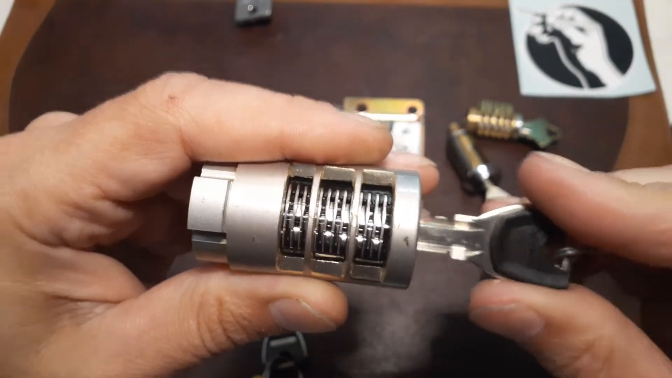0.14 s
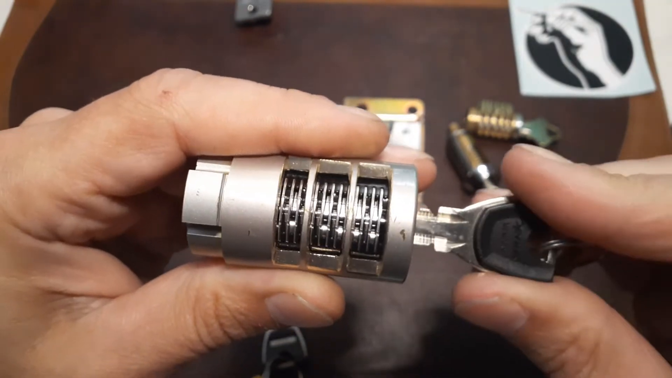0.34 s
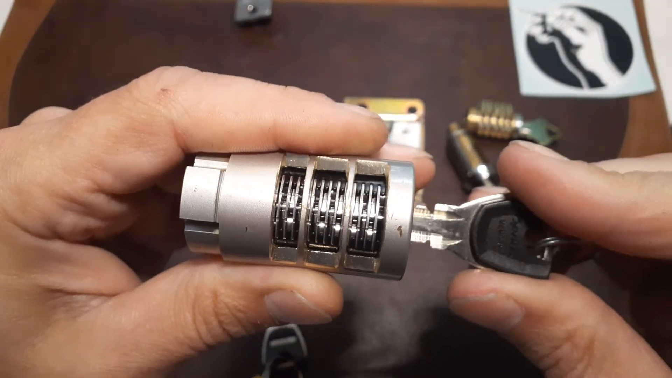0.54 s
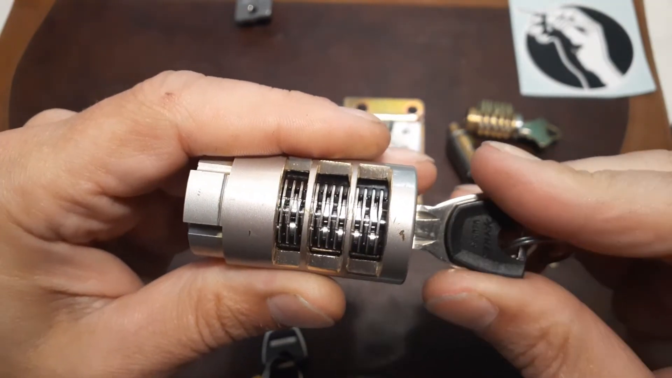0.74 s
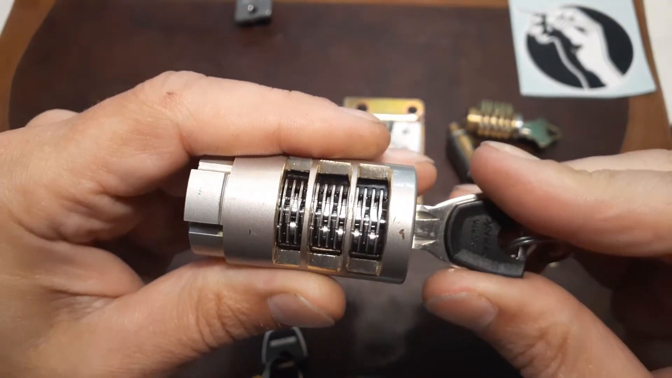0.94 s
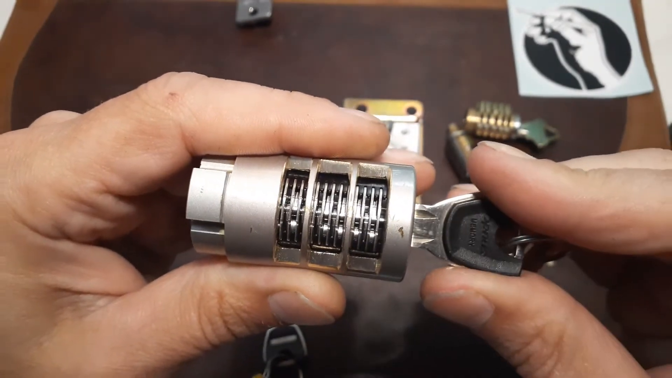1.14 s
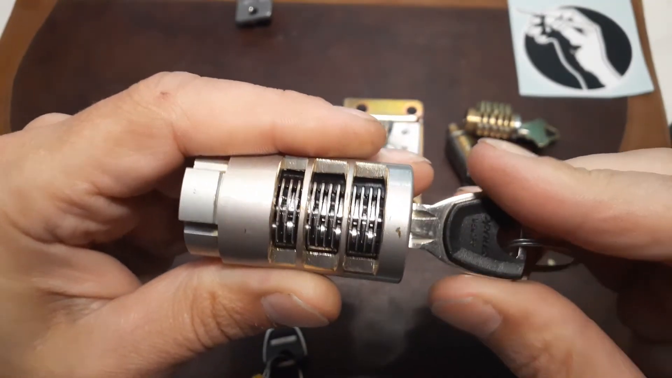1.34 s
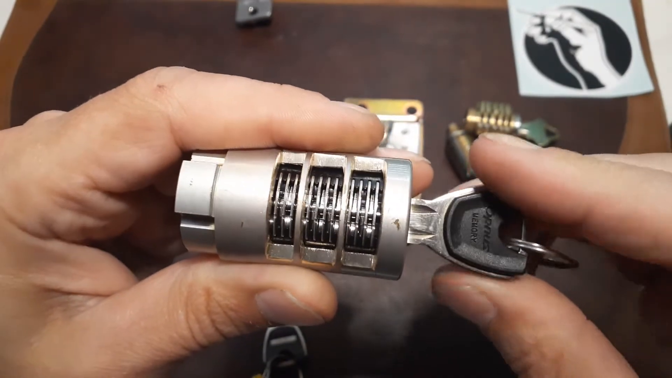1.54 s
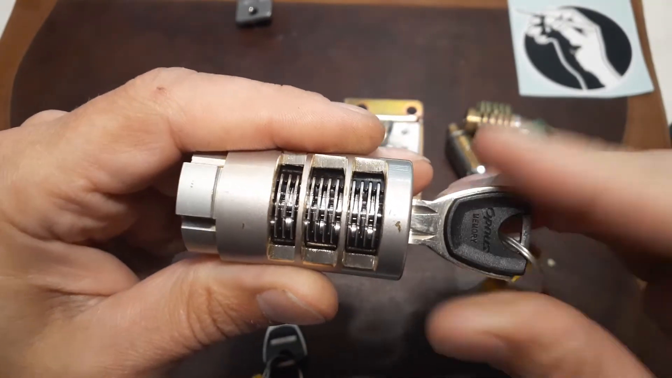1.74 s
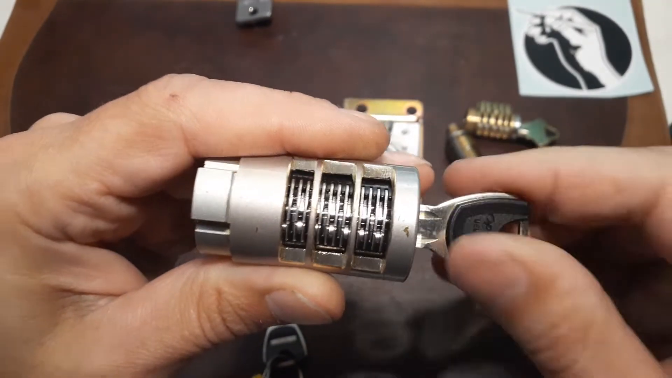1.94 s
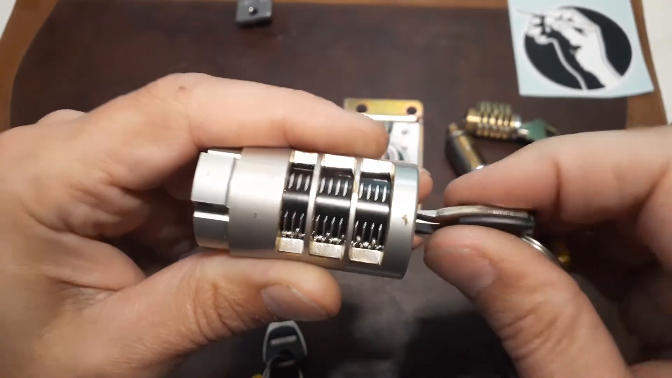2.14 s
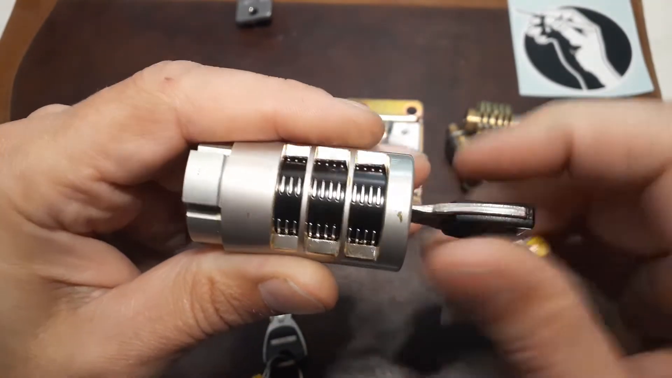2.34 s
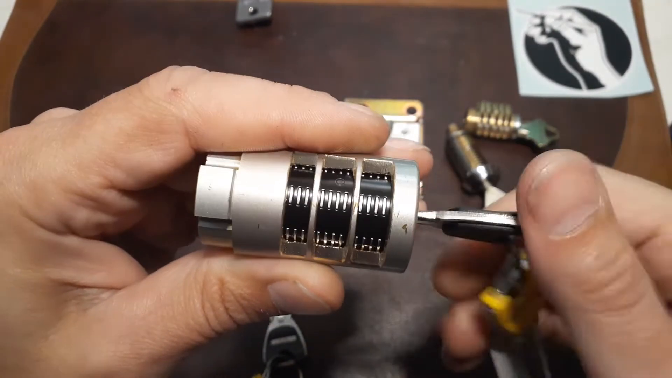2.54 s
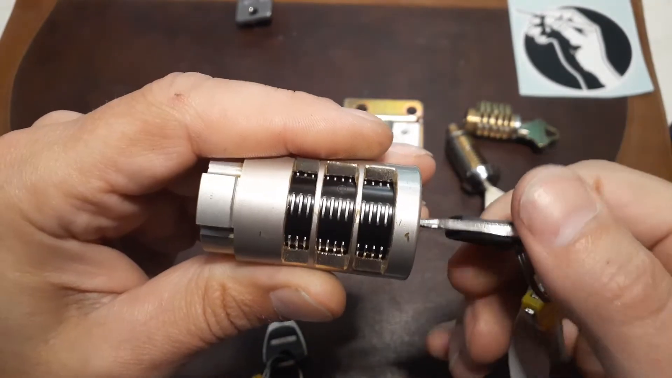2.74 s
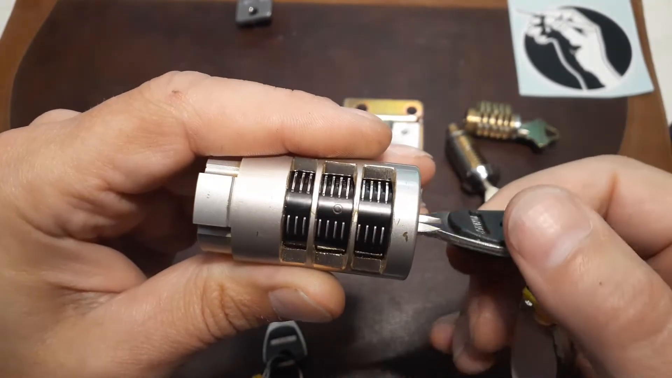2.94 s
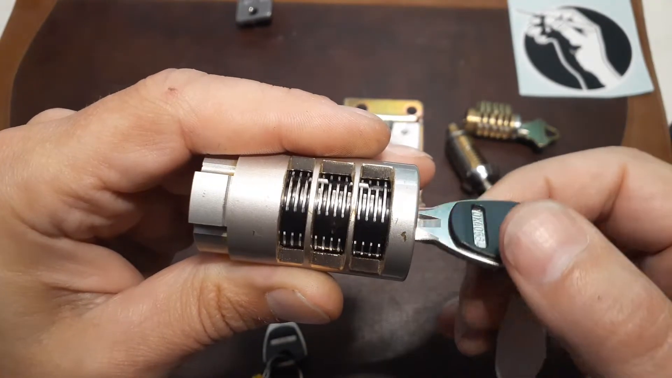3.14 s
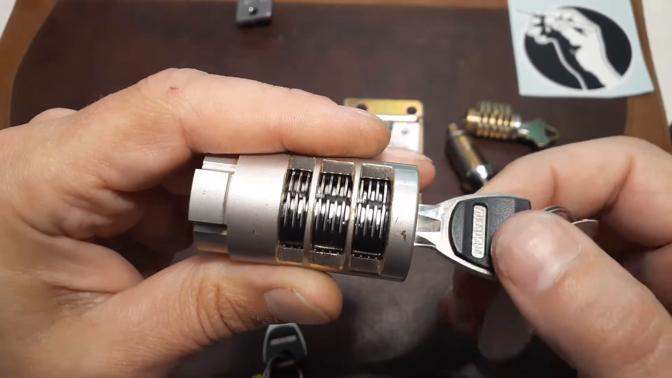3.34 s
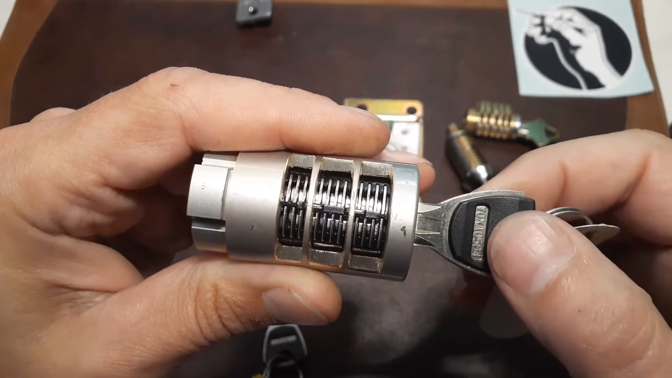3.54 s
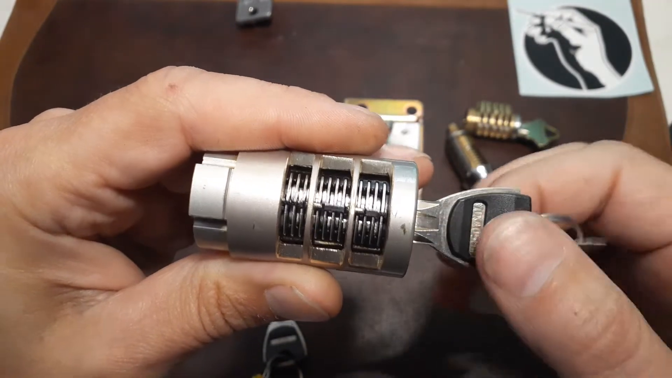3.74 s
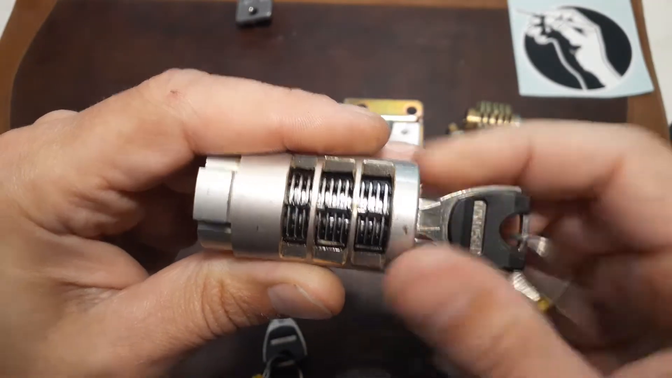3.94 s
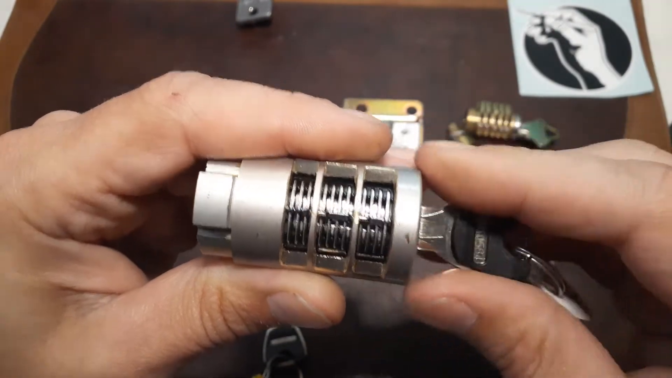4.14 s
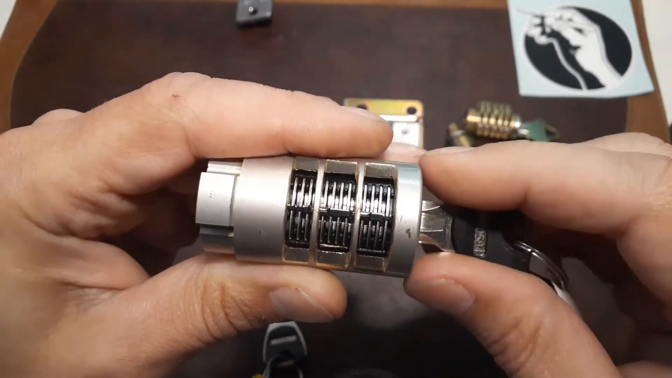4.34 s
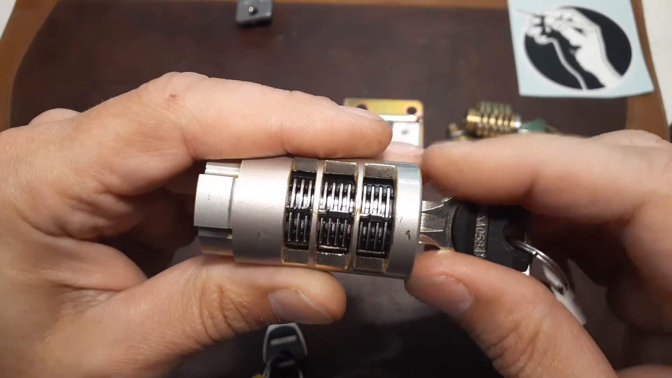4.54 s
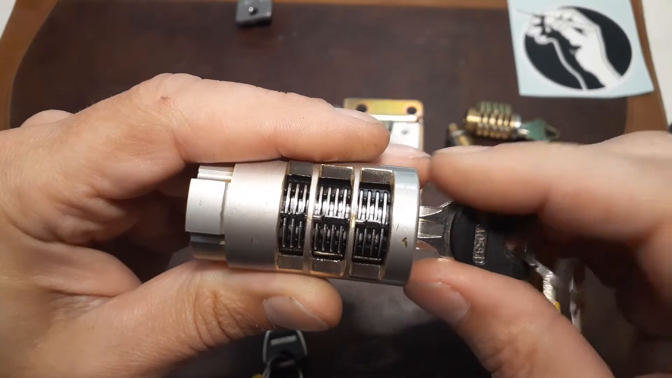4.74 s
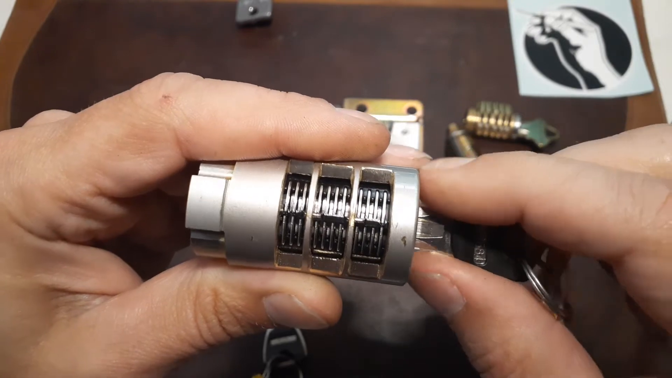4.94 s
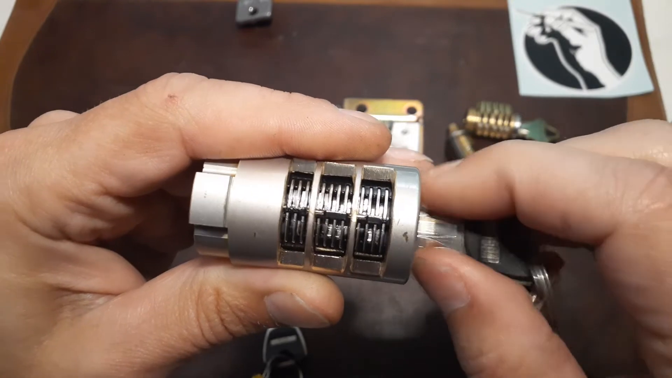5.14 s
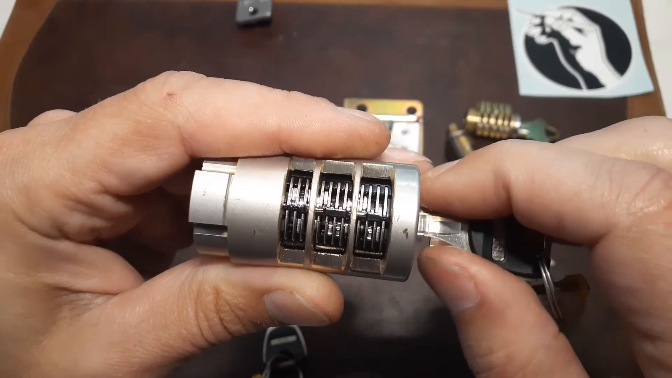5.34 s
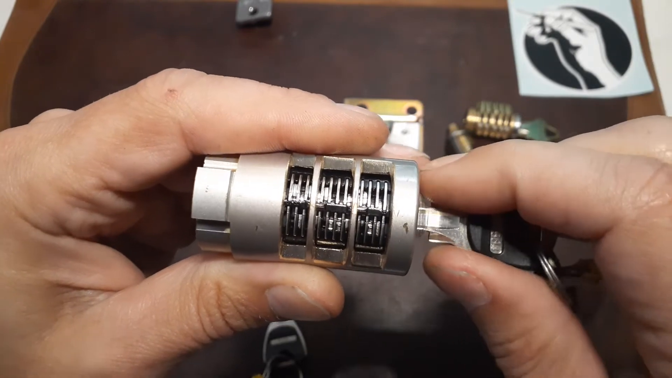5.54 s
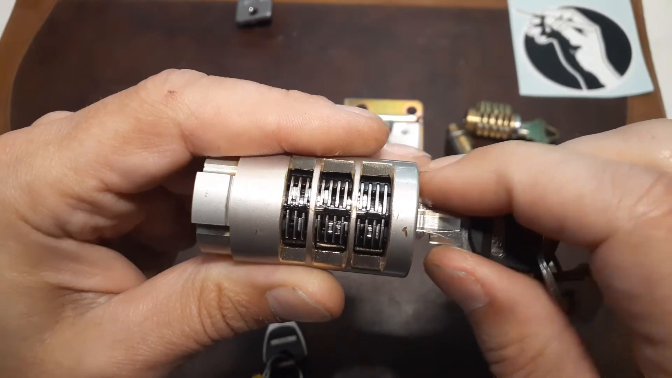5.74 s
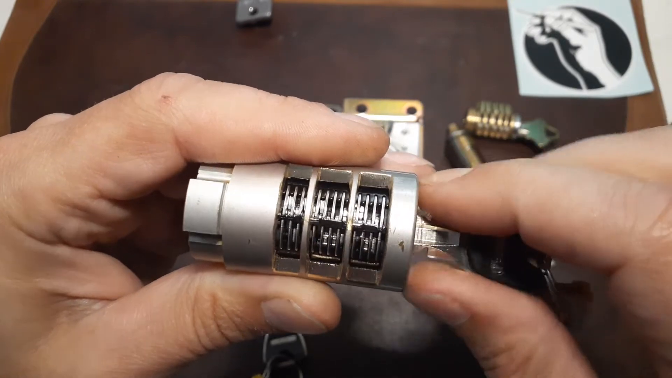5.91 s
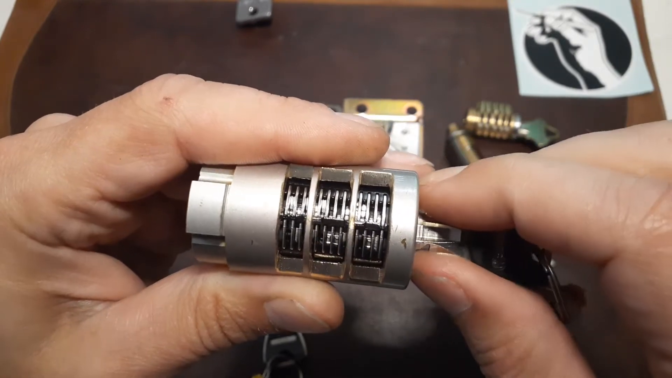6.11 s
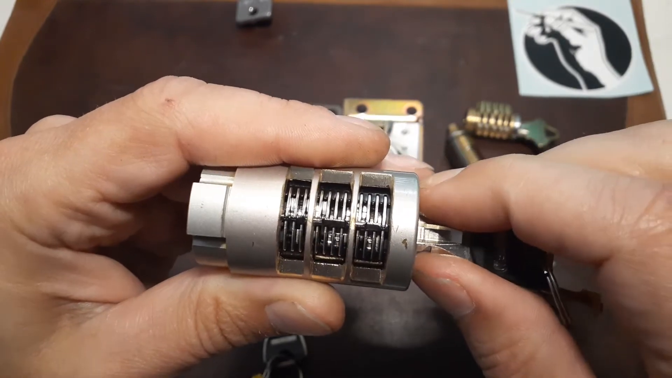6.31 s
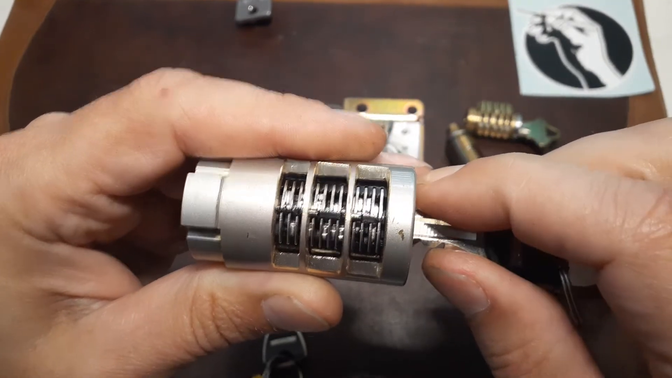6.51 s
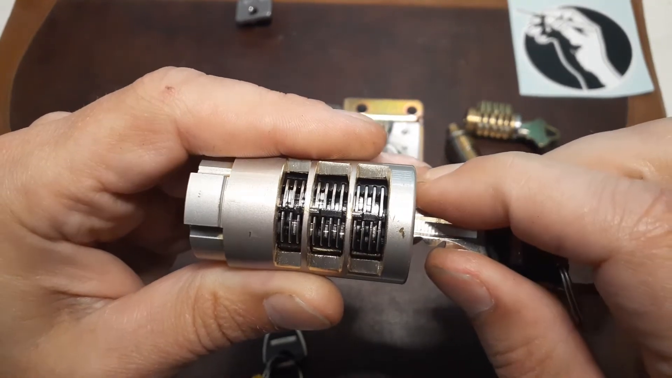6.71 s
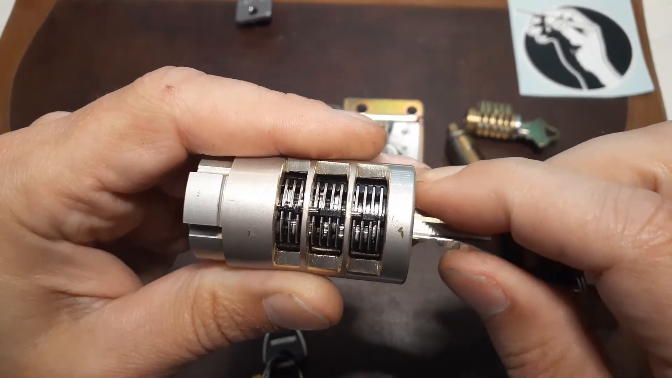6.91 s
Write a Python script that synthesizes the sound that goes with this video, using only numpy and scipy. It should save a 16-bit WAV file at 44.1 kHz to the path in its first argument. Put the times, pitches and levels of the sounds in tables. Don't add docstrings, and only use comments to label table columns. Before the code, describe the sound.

Close, sharp metallic clicks of a key worked in a disc lock, with light finger rubbing, soft air thumps and quiet room hum.

```python
import sys
import numpy as np
from scipy import signal
from scipy.fft import rfft, irfft, next_fast_len
from scipy.io import wavfile
from scipy.ndimage import uniform_filter1d

SR = 44100
rng = np.random.default_rng(int(sys.argv[2]) if len(sys.argv) > 2 else 0)


def natural_amplitude(level_db):
    exponent = np.asarray(level_db, float) / 20
    return 10 ** exponent


def store_pcm(level_fs):
    pcm = np.round(np.clip(level_fs, -1, 1) * 32767).astype(np.int16)
    wavfile.write(sys.argv[1], SR, np.atleast_2d(pcm).T)


N = 307377


def rms_one(x):
    return x / np.sqrt(np.mean(x ** 2) + 1e-20)


def at_hz(points, hz, col=1):
    points = np.array(points, float)
    return np.interp(np.log(hz), np.log(points[:, 0]), points[:, col])


def band(x, low_hz, high_hz):
    return signal.sosfilt(signal.butter(2, [low_hz, high_hz], "band", fs=SR, output="sos"), x)


def left_right(difference_db):
    return natural_amplitude(np.array([[0.5], [-0.5]]) * difference_db)


def drift(rate):
    step, settle = 40, 2000
    r = np.exp(-2 * np.pi * rate * step / SR)
    chance = rng.standard_normal(N // step + settle + 2)
    slow = signal.lfilter([1], [1, -2 * r, r * r], chance)[settle:]
    return np.interp(np.arange(N) / step, np.arange(len(slow)), rms_one(slow))


def swells(rows, rise, edge_db, power):
    gain, t = np.zeros(N), np.arange(N) / SR
    rise = np.clip(rise, 0.05, 0.95)
    for top_s, length, level_db in rows:
        first = max(round((top_s - 2 * length) * SR), 0)
        at = slice(first, round((top_s + 2 * length) * SR))
        before = (top_s - t[at]) / rise
        after = (t[at] - top_s) / (1 - rise)
        away = np.maximum(before, after) / length
        gain[at] += natural_amplitude(level_db - edge_db * away ** power)
    return gain


def contacts_of_key():
    # (time [s], peak [dB], barrel knock re snap [dB], chatter [ms])
    push_in = [(0.111, -32.5, -12, 2.5), (0.1144, -25, -8, 8.9), (0.1186, -30.5, -15.5, 3.7),
               (0.1332, -24.5, -7, 1.8), (0.1436, -30.5, -26.5, 7.2), (0.1525, -17, -10.5, 3.9),
               (0.1605, -26, -2.5, 2.3), (0.168, -20, -6.5, 1.8), (0.1873, -33, -5.5, 1.2),
               (0.2088, -32.5, -10.5, 2.0), (0.212, -21, -7.5, 1.2), (0.2169, -27, -6.5, 6),
               (0.2227, -32.5, -8.5, 2.5), (0.2319, -36, 0, 0.83), (0.6108, -39.5, -13, 2),
               (0.62, -28.5, -9, 2.0), (0.622, -24, -11, 5.7), (0.6261, -27, -9.5, 3.3),
               (0.6329, -22.5, -4.5, 1.7), (0.6481, -35.5, 0, 3.5), (0.656, -25.5, -9, 1.4),
               (0.6598, -16, -13.5, 3.6), (0.6659, -19.5, -3.5, 0.65), (0.672, -33, -21.5, 2.2)]
    # (time [s], peak [dB], barrel knock re snap [dB], chatter [ms])
    turning = [
        (2.024, -46, -12, 3.0),
        (2.0272, -30, -11.5, 8.6),
        (2.0346, -36.5, -7, 5.4),
        (2.0882, -35.5, -31, 2.7),
        (2.0935, -35, -10, 1.4),
        (2.0967, -37.5, -6.5, 3.7),
        (2.104, -46, 5.5, 4.0),
    ]
    # (time [s], peak [dB], barrel knock re snap [dB], chatter [ms])
    stopping = [
        (3.4345, -26.5, -11.5, 1.5),
        (3.436, -17, -14, 0.97),
        (3.439, -26.5, -7.5, 1.1),
        (3.442, -27, -8.5, 3.0),
        (3.451, -34, -17, 4.1),
        (4.0903, -40, -7.5, 1.56),
        (4.986, -45, -12, 1.1),
    ]
    # (time [s], peak [dB], barrel knock re snap [dB], chatter [ms])
    pull_out = [(5.1486, -39.5, -8, 1.25), (5.169, -25.5, -13.5, 2.1), (5.173, -22.5, -12.5, 5.3),
                (5.1771, -22, -24, 1.6), (6.4992, -34, -19.5, 1.6), (6.5105, -32, -20, 2.5),
                (6.5139, -21.5, -15, 2.9), (6.5193, -23, -17.5, 2.26), (6.809, -39.5, -23, 2.6),
                (6.8176, -25, -12.5, 3.9), (6.823, -18, -17.5, 0.93), (6.835, -45.5, 1, 2.2)]
    # (time [s], peak [dB], barrel knock re snap [dB], thinness [dB])
    touches = [(1.3226, -53, -7, 4.5), (1.6517, -58, -26.5, 4), (1.8197, -52, -13, -2),
               (1.9156, -64, 3.5, 7), (1.9298, -57.5, -1, -2), (1.977, -50.5, -16, -2),
               (2.0037, -57.5, 0, -1), (2.397, -56, -10, 5), (2.6404, -63, -15, 6), (2.7156, -65, -12, -28),
               (2.771, -55, 9, -19), (2.7823, -42.5, 3.5, -23.5), (2.8964, -68, 9, -6), (2.912, -72, 1, 10),
               (3.4115, -63, -8, 13.5), (3.4218, -54.5, -11, 7.5), (3.6647, -62.5, 9, -2),
               (3.9889, -55, 7.5, -12), (4.046, -57, -15, 1.5), (4.0807, -61.5, 13, 9),
               (4.1466, -55, -9, 3), (4.822, -60, 2.5, 0.5), (4.985, -49.5, -4.5, -12.5),
               (5.114, -54, -7.5, -12), (5.3376, -57, -9.5, -3)]
    depth_per_knock, thin_per_knock = 0.55, -0.2
    contacts = []
    for rows, deep_db, thin_db in ((push_in, -10, 6.5), (turning, -2.5, 4),
                                   (stopping, -2.5, 3.76), (pull_out, -6.5, 6)):
        for s, peak_db, knock_db, chatter_ms in rows:
            excess_db = knock_db + 10
            depth_db = deep_db + depth_per_knock * excess_db
            contacts.append((s, peak_db, knock_db, chatter_ms, depth_db, thin_db + thin_per_knock * excess_db))
    for s, peak_db, knock_db, thin_db in touches:
        contacts.append((s, peak_db, knock_db, 1.7, -3.0 + depth_per_knock * knock_db, thin_db))
    return contacts


def struck(spectrum, tilt_db, pivot_hz, t60, lag_s, spread_db, scatter=1.1, count=64):
    t = np.arange(SR // 90) / SR
    hz = np.linspace(spectrum[0][0], spectrum[-1][0], count)[:, None] * rng.uniform(0.97, 1.03, (count, 1))
    colour_db = at_hz(spectrum, hz) + 0.7 * tilt_db * np.tanh(np.log2(hz / pivot_hz) / 0.12)
    decay = natural_amplitude(colour_db - 60 * t / (t60 * rng.uniform(0.29, 2.7, hz.shape)))
    own_db = spread_db * rng.standard_normal((2, count, 1))
    common_db = spread_db * rng.standard_normal((count, 1))
    phase = scatter * rng.standard_normal((2, count, 1)) + 2 * np.pi * rng.random((count, 1))
    phase[0] -= 2 * np.pi * hz * lag_s
    return (natural_amplitude(own_db + common_db) * decay * np.sin(2 * np.pi * hz * t + phase)).sum(axis=1)


def snaps():
    # (frequency [Hz], level [dB per Hz])
    disc_colour = [(3410, -45), (5800, -23), (6460, -11.5), (7480, -13), (8650, 1), (10600, -2.5),
                   (14300, 1.5), (15700, -1)]
    # (frequency [Hz], level [dB per Hz])
    barrel_colour = [(1150, -32.5), (1600, -14), (2200, 1.5), (2800, -2), (3500, 1.5), (4200, -0.5),
                     (5300, -11), (6500, -12.5)]
    out, push = np.zeros((2, N + SR)), np.zeros(N + SR)
    t = np.arange(SR // 30) / SR
    for s, peak_db, knock_db, chatter_ms, deep_db, thin_db in contacts_of_key():
        start = round(s * SR)
        onset = 1 - np.exp(-t / (0.000056 * chatter_ms))
        fade = onset * np.exp(-t / (0.001 * chatter_ms))
        contacts = fade * rng.standard_normal(len(t)) * natural_amplitude(4.8 * rng.exponential(1, len(t)))
        push[start:start + len(t)] += natural_amplitude(peak_db + knock_db - 10.5) * fade * np.sign(contacts[1])

        blunt = np.clip((-12 - thin_db) / 13.5, 0, 1)
        light = np.clip((-44.5 - peak_db) / 12, 0, 1)
        disc = struck([(hz, db * (1 - blunt)) for hz, db in disc_colour], thin_db - 4.0, pivot_hz=10800,
                      t60=0.0075 + 0.004 * light, lag_s=0.0001, spread_db=2.5 + 2.9 * light)
        barrel = struck([(hz, db * (1 - blunt)) for hz, db in barrel_colour], -deep_db - 5.0, pivot_hz=2340,
                        t60=0.0098, lag_s=0.00017, spread_db=-0.5 + 0.84 * light, scatter=0.76, count=40)
        for modes, level_db, pan_db in ((disc, -2.1, 6.5), (barrel, knock_db - 3.5, 3.5)):
            hit = signal.fftconvolve(modes, contacts[None], axes=1)
            power = uniform_filter1d(hit ** 2, size=50)
            top = np.sqrt(power.max(axis=1, keepdims=True))
            out[:, start:start + hit.shape[1]] += natural_amplitude(peak_db + level_db) * left_right(pan_db) * hit / top
    small = signal.sosfilt(signal.butter(4, 1200, "high", fs=SR, output="sos"), out[:, :N])
    return small + band(push[:N], 250, 1500) * left_right(3.0)


def rubbing():
    # (top [s], length [s], level [dB])
    grip = [
        (2.0, 0.95, -83.5),
        (2.8, 1.53, -88),
        (3.8, 1.0, -82.5),
        (5.1, .8, -81),
    ]
    # (most pressure [s], length [s], key ring [dB], skin re ring [dB], barrel re ring [dB])
    strokes = [(1.341, 0.055, -83, 10, -4), (1.84, 0.047, -71.5, 2, -5), (1.979, 0.082, -61, 0, -4),
               (2.036, 0.044, -63, -1, -4), (2.068, 0.027, -65, 8, -11), (2.164, 0.069, -67.5, 4.5, -4.5),
               (2.384, 0.045, -71.5, 0, -8), (2.441, 0.057, -70, 3.5, -4), (2.635, 0.12, -77, 0, -12),
               (2.713, 0.043, -61.5, -9, -9.5), (2.762, 0.06, -67, -14, -3), (2.797, 0.095, -83, 10, 3),
               (2.915, 0.026, -71, -4, 1.5), (3.64, .04, -85, 9, 14), (3.675, 0.064, -67, -4, 0.2),
               (3.907, .13, -71, -5, -12), (3.99, 0.078, -74, -10, -3), (4.037, 0.064, -75.5, 1, 2),
               (4.094, 0.059, -77.5, 4, 9.5), (4.15, .06, -76, 4.5, -2.5), (4.835, 0.056, -77.5, -7, 0),
               (4.982, 0.047, -76.5, -10, -1.5), (5.353, 0.076, -78, 4.5, 3), (5.89, 0.19, -80.5, 1, -5)]
    bursts_db = 2.6 * np.minimum(rng.exponential(1, N), 5) + 2.2 * drift(150)
    slips = rng.standard_normal((2, N)) * natural_amplitude(bursts_db)
    key = band(slips, 8450, 9500)
    key += natural_amplitude(-6.0) * band(slips, 7140, 7700) + natural_amplitude(-10.0) * band(slips, 7500, 11500)
    skin = band(slips, 11100, 15700)
    skin += natural_amplitude(-2.5) * band(slips, 10200, 13000) + natural_amplitude(-18.0) * band(slips, 5100, 7300)
    barrel = band(slips, 1700, 2150) + natural_amplitude(4.5) * band(slips, 2220, 2380)
    barrel += natural_amplitude(-1.5) * band(slips, 3780, 4460) + natural_amplitude(-4.0) * band(slips, 2900, 3400)

    s, length, key_db, skin_db, barrel_db = np.transpose(strokes)
    out = swells(grip, rise=0.45, edge_db=9.5, power=2) * rms_one(band(slips[::-1], 5000, 21000))
    for x, level_db in ((key, key_db), (skin, key_db + skin_db), (barrel, key_db + barrel_db)):
        pressure = swells(zip(s, length, level_db), rise=0.39, edge_db=11.5, power=1.3)
        out = out + pressure * natural_amplitude(2.0 * drift(23)) * rms_one(x)
    return out * natural_amplitude([[1.5], [-3.5]])


def rings():
    # (struck [s], frequency [Hz], level [dB], t60 [s], left-right difference [dB])
    ring_tones = [
        (0.156, 7150, -61.5, 0.4, -3.5),
        (.212, 7120, -53.5, 0.45, 4),
        (.212, 7300, -67, 0.19, 0),
        (.661, 7130, -52.5, 0.52, 3.5),
        (.661, 7390, -56.5, 0.3, 0.5),
        (.661, 7930, -77, .6, -2.5),
        (3.436, 4393, -42.5, 0.36, 13.5),
        (3.437, 8575, -35, .05, 7.5),
    ]
    out = np.zeros((2, N))
    t = np.arange(SR) / SR
    for s, hz, level_db, t60, pan_db in ring_tones:
        stilled_db = -20 * np.maximum(t - 0.27, 0) / 0.05
        phase = 2 * np.pi * hz * t + np.array([[0], [1.2]])
        tone = natural_amplitude(level_db - 60 * t / t60 + stilled_db) * np.sin(phase)
        start = round(s * SR)
        out[:, start:start + SR] += tone * left_right(pan_db)
    return out


def draught():
    # (top [s], length [s], level [dB])
    gusts = [
        (.19, 0.24, -64),
        (.65, 0.23, -67.5),
        (1.545, 0.14, -42.5),
        (1.656, .08, -59),
        (4.01, .14, -45),
        (4.096, 0.051, -63.5),
        (4.168, 0.12, -41),
        (6.525, 0.15, -66.5),
        (6.89, .3, -71),
    ]
    lumps = band(rng.standard_normal((2, N)), 66, 140) * natural_amplitude(2.0 * drift(27))
    pressure = swells(gusts, rise=0.35, edge_db=24, power=1.2)
    return pressure * rms_one(band(lumps, 30, 230)) * natural_amplitude([[5.0], [-18.0]])


def room(x):
    # (low edge [Hz], high edge [Hz], level [dB], t60 [s])
    tail_bands = [(497.6, 2100, -19.5, 0.21), (3017, 7600, -21, 0.14), (6780, 21000, -24.5, 0.14)]
    t = np.arange(SR // 3) / SR
    tail = 0
    for low_hz, high_hz, level_db, t60 in tail_bands:
        noise = band(rng.standard_normal((2, len(t))), low_hz, high_hz) * (1 - np.exp(-t / 0.00077))
        tail = tail + natural_amplitude(level_db - 15.5 - 60 * t / t60) * noise
    return signal.fftconvolve(x, tail, axes=1)[:, :N]


def hum():
    # (frequency [Hz], left [dB], right [dB], left lead [rad])
    hum_tones = [(119.5, -80, -81, -0.1), (258.4, -64, -63, -0.0), (515.5, -69, -73, -1.8),
                 (586.8, -80, -77, -1.7), (839.8, -78, -86, -1.6), (2320, -91, -100, -0.6),
                 (9001, -100, -104, -1.1), (14686, -86, -93, -1.3)]
    out, t = 0, np.arange(N) / SR
    for hz, left_db, right_db, lead in hum_tones:
        phase = 2 * np.pi * hz * t + 1.5 * drift(2.0) + np.array([[lead], [0]])
        waver_db = 1.7 * drift(8) - 0.8
        level_db = np.array([[left_db], [right_db]]) + waver_db
        out = out + np.sqrt(2) * natural_amplitude(level_db) * np.sin(phase)
    return out


def room_air():
    # (frequency [Hz], left [dB per Hz], right [dB per Hz])
    air_colour = [(30, -9.5, -20), (57.5, 0, -3), (110, 3, -0.5), (200, 8.5, 6.5), (297, 16.5, 11),
                  (457, 8, -1.5), (498.3, 5.5, 7), (674.4, 7, 4.5), (1090, -9.5, -10.5), (1400, -13, -8),
                  (2020, -7, -12), (3270, -23, -19.5), (6300, -29, -27.5), (11800, -18.5, -20)]
    # (frequency [Hz], likeness [-1 to 1])
    likeness = [(60, 0.73), (130, 0.94), (290, 0.97), (640, -0.045), (1400, -0.56), (3000, 0.05),
                (15000, -0.41)]
    size = next_fast_len(N)
    hz = np.maximum(np.fft.rfftfreq(size, 1 / SR), 1)
    first, second = rfft(rng.standard_normal((2, size)))
    alike = np.clip(at_hz(likeness, hz), -1, 1)
    pair = np.array([first, alike * first + np.sqrt(1 - alike ** 2) * second])
    colour_db = np.array([at_hz(air_colour, hz, col=1), at_hz(air_colour, hz, col=2)])
    shape = natural_amplitude(colour_db - 101.5) * (hz < 15900) * (hz > 20)
    return irfft(pair * shape, size)[:, :N] * np.sqrt(SR / 2) * natural_amplitude(1.7 * drift(2.8))


def scene():
    lock = snaps() + rubbing()
    return lock + room(lock) + rings() + draught() + room_air() + hum()


def roll_off(x):
    return signal.sosfilt(signal.butter(12, 16790, fs=SR, output="sos"), x)


def record(dry):
    # (frequency [Hz], gain [dB])
    top_edge = [(15800, 0), (16100, -22), (16800, -30)]
    loud = uniform_filter1d(np.mean(dry ** 2, axis=0), size=441)
    over_db = np.maximum(10 * np.log10(loud + 1e-12) + 36, 0)
    recovery_db = 0.63 * np.arange(N) / SR
    held_db = np.maximum.accumulate(0.12 * over_db + recovery_db) - recovery_db
    levelled = dry * natural_amplitude(-uniform_filter1d(held_db, size=883, origin=440))
    size = next_fast_len(N)
    shelf = natural_amplitude(at_hz(top_edge, np.fft.rfftfreq(size, 1 / SR) + 1))
    mix = irfft(rfft(levelled, size) * shelf, size)[:, :N]
    return roll_off(mix)


dry = scene()
out = record(dry)
store_pcm(out)
```